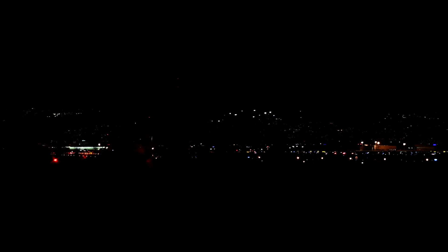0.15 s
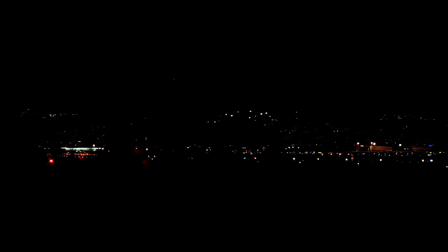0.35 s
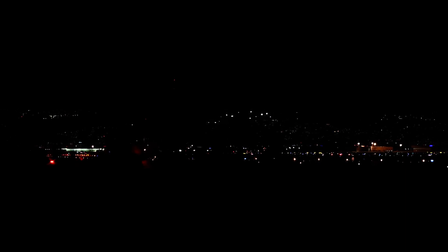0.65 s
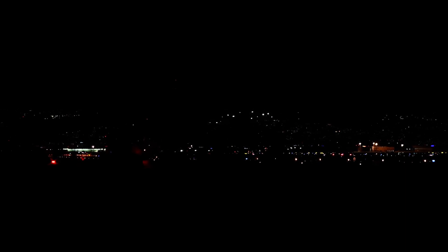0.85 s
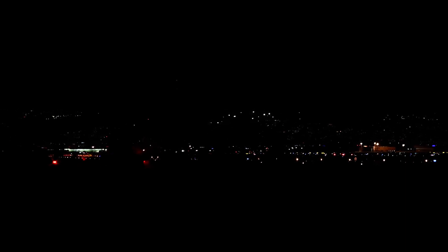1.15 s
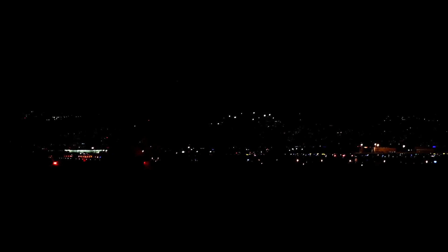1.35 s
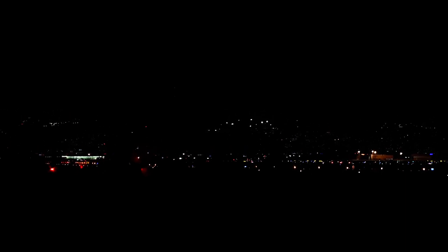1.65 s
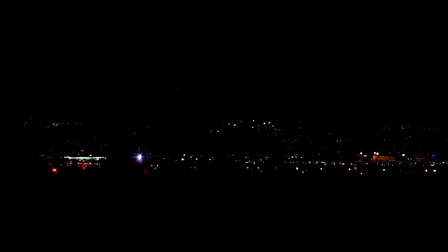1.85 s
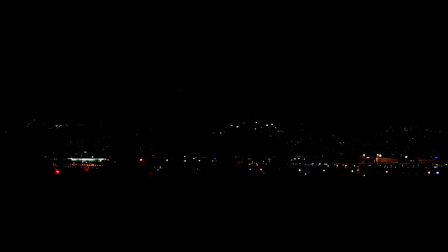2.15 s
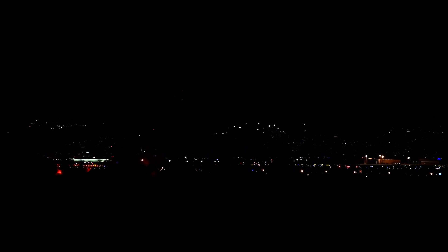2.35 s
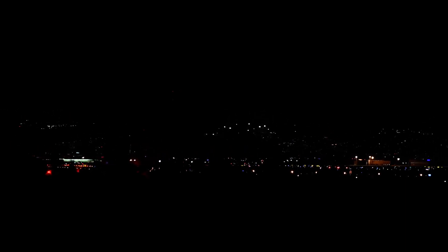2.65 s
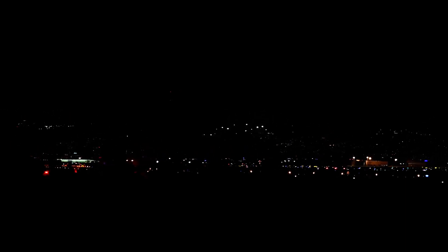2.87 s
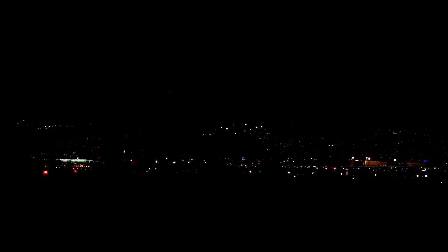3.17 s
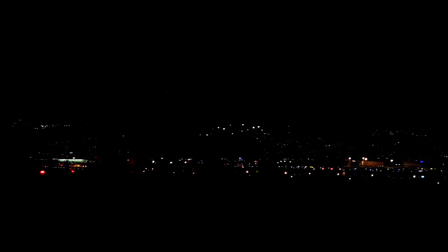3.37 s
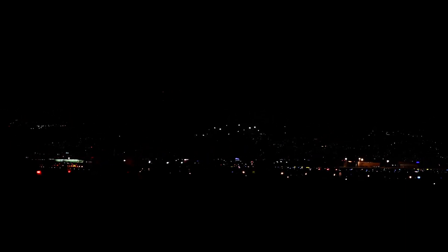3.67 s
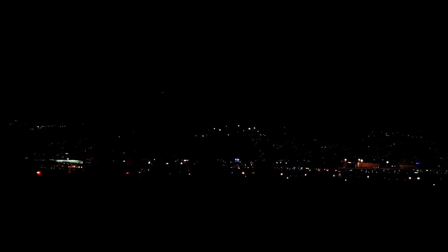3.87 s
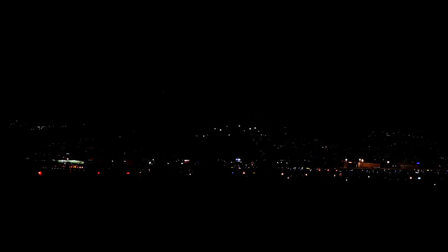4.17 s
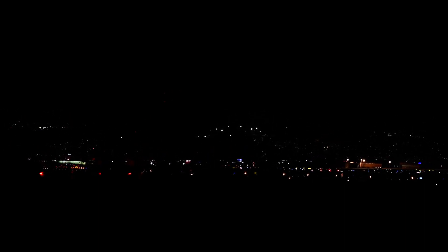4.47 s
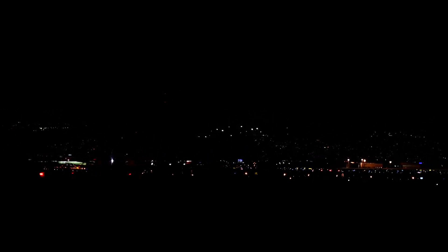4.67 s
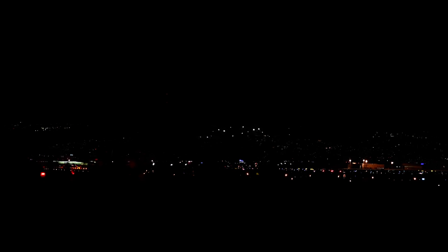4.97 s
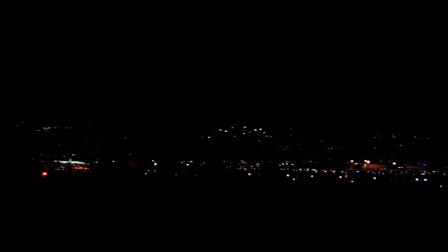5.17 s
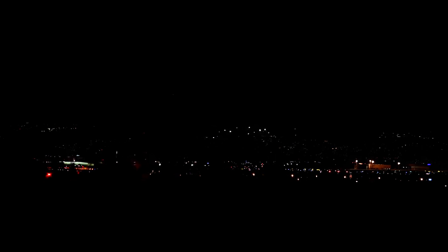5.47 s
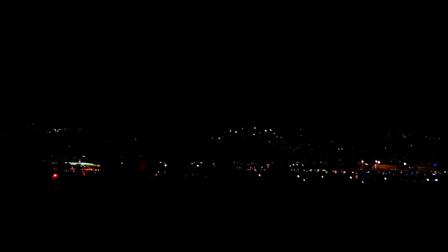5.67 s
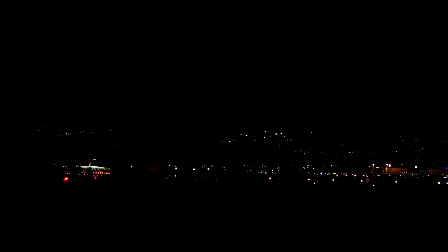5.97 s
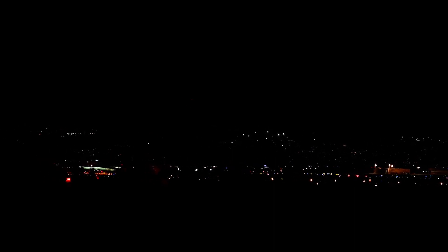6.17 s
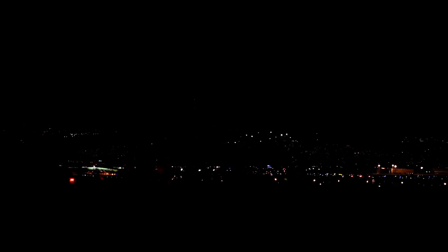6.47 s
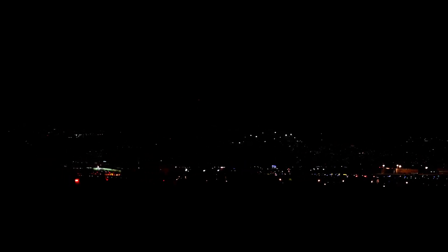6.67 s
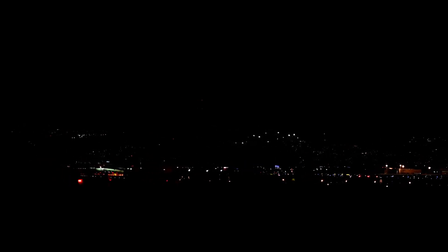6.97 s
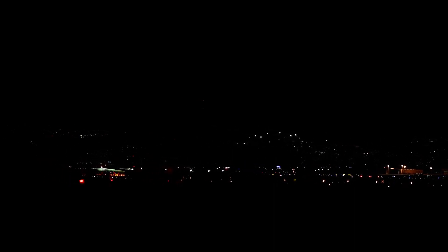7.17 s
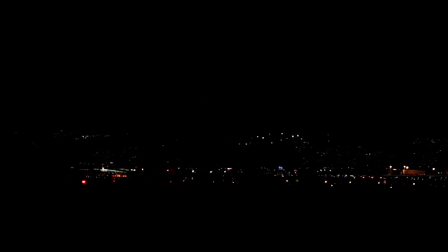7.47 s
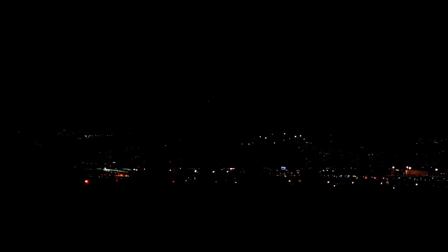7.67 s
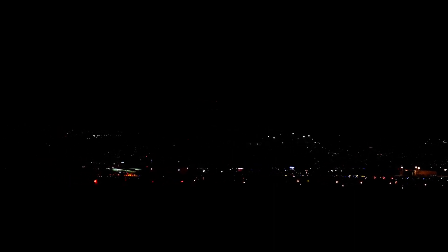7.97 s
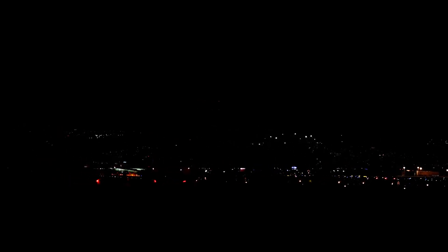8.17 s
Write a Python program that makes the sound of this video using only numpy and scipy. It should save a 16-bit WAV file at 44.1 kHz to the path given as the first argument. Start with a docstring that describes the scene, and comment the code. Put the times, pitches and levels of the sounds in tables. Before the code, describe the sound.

Outdoors on a hill above a night airfield, a far jet's deep rumble slowly swells into a fuller roar with a faint climbing tone. Nearby field crickets chirp in separate songs, a tree cricket trills in short bouts, and tiny insects tick. A hand-held camera adds early finger clicks, two soft bumps, faint whine and hiss; breeze puffs buffet it late.

```python
"""Jet and crickets at night

On a hill above an airfield a distant jet nears: coloured noise bands and a climbing tonal ridge swell.
Field crickets (chirped wing strokes), tree crickets (stroke trains) and smaller insects sing and tick.
A light breeze (low noise puffs) brushes a hand-held camera; fingers touch it (noise bursts, damped
bumps) and its electronics whine faintly twice a second (gated sines). Steady coloured hiss lies below."""
import sys
import numpy as np
from scipy import signal
from scipy.fft import rfft, irfft, next_fast_len
from scipy.io import wavfile
from scipy.ndimage import uniform_filter1d, map_coordinates

SR = 44100
rng = np.random.default_rng(int(sys.argv[2]) if len(sys.argv) > 2 else 0)


def master_out(mix):
    """Clip the mix to full scale and print it as 16-bit PCM to the path in sys.argv[1]."""
    frames = np.transpose(np.atleast_2d(mix))
    ceiling = np.clip(frames, -1, 1)
    pcm = np.round(ceiling * 32767).astype(np.int16)
    wavfile.write(sys.argv[1], SR, pcm)


N = 367132
T = np.arange(N) / SR

# jet approach, before trims: [t/s, roar level/dB, high rush level/dB]
JET_APPROACH = [(0.1, -62.5, -69), (2.15, -61, -72), (2.76, -61, -71.5), (3.23, -58.5, -70),
                (4.09, -58.5, -68), (6.94, -48.5, -59.5), (7.3, -49.5, -59.5), (7.84, -48, -59.5),
                (8.2, -49, -59.5)]
# spectra, relative density: [f/Hz, level/dB]
FAR_RUMBLE_SPECTRUM = [(12, -47), (22, -25), (33, -18), (52, -3.5), (75, 1), (97, 1.5), (125, -4),
                       (150, -5.5), (180, -14), (225, -15.5), (330, -36)]
NEAR_RUMBLE_SPECTRUM = [(12, -40), (22, -15), (33, -15.5), (46, 2), (62, -0.5), (95, -1), (120, -5.5),
                        (148, -11), (175, -24), (260, -40)]
# roar spectrum as for a ridge at ROAR_REF_HZ, relative density: [f/Hz, level/dB]
ROAR_SPECTRUM = [(130, -24), (180, -2), (215, -2.5), (250, -3.5), (300, -1.5), (400, -1.5), (520, -2),
                 (610, -1), (685, -4.5), (730, -6.5), (800, -12), (1100, -47.5)]
# spectra, relative density: [f/Hz, level/dB]
RUSH_SPECTRUM = [(550, -9.5), (700, -0.5), (800, -4.5), (970, -1), (1100, -6), (1210, -9), (1450, -7.5),
                 (1640, -11.5), (1830, -17), (2050, -15.5), (2640, -22.5), (3900, -37.5)]
HISS_SPECTRUM = [(1100, -6.5), (1750, 9), (2200, 2), (2800, -3.5), (4400, -3.5), (6100, -4), (7800, -5.5),
                 (9600, -0.5), (10800, -8.5), (12500, -14.5), (15500, -24)]
BUFFET_SPECTRUM = [(12, -28), (20, -8), (80, 8), (125, 1.5), (250, -6), (450, -25), (800, -50)]
# rumble surges on the way through the air: [peak t/s, length/s, extra level/dB]
RUMBLE_SURGES = [(3.9, 1, 3), (6.423, 0.51, 3.5), (7.5, 0.56, 3.5)]
# nearest tree cricket's bouts, nominal level: [start t/s, length/s, level/dB]
TREE_CRICKET_BOUTS = [(0, 0.34, -69.5), (.49, .28, -68.5), (1.0, 0.21, -66), (1.44, 0.26, -67.5),
                      (1.99, 0.24, -67), (2.485, .35, -64), (3.0, 0.37, -66), (3.426, 0.25, -67.5),
                      (3.93, 0.16, -65), (5.544, 0.12, -69.5), (5.992, 0.15, -68.5), (6.664, .18, -70),
                      (8.05, 0.15, -71)]
# breeze puffs at the microphone ports, nominal level: [peak t/s, length/s, level/dB]
BREEZE_PUFFS = [(.15, 0.66, -69), (1.44, 0.21, -71), (2.855, 0.28, -64.5), (5.622, 0.086, -69),
                (6.032, 0.17, -74), (6.888, 0.24, -50), (7.55, .2, -62), (8.05, 0.76, -59)]
# bush cricket rasps, level before pan and tail: [first t/s, rasps, spacing/s, level/dB]
BUSH_CRICKET_RASPS = [(0.11, 4, .14, -74), (2.18, 5, .135, -76), (4.40, 5, .135, -76), (6.43, 6, 0.14, -78)]
# triple ticks of a small insect, level before pan and tail: [t/s, level/dB]
TRIPLE_TICKS = [(0.645, -74), (1.80, -74), (2.93, -74), (4.14, -74), (5.29, -73), (6.27, -75), (7.575, -72)]
# thin high calls, level before pan and tail: [first t/s, strokes, spacing/s, level/dB]
THIN_CALLS = [(2.81, 5, .073, -86), (6.39, 4, .073, -83.5)]
# finger clicks, noise level before band-pass: [t/s, level/dB]
FINGER_CLICKS = [(0.2942, -71), (0.3074, -61.5), (0.316, -66), (0.3556, -64), (0.398, -69)]
# camera body bumps, nominal level before left/right offset: [t/s, level/dB, f/Hz]
BODY_BUMPS = [(0.395, -45, 120), (0.828, -50, 102)]
# field cricket songs, counts get rounded, f and level nominal: [start t/s, slow strokes, slow spacing/s,
# trill strokes, pairs, f/Hz, level/dB, trill re slow strokes/dB, left re right/dB, left lead/rad]
FIELD_CRICKET_SONGS = [ (0.452, 6, .068, 4, 2.5, 3886, -66.5, -5, 4, 0.2),
                       (1.399, 6, .067, -0.5, 0.5, 4120, -74, -6, 1, -2.5),
                       (2.048, 6, .0712, 3, 2.5, 3830, -70.5, -4, -9.5, 4.5),
                       (2.742, 6, .071, 6.5, 1, 3920, -67.5, -7.5, 4.5, -2.5),
                       (4.283, 7, .069, 5, 4, 3870, -64.5, -6, 6, .7),
                       (6.241, 6, .072, 7.5, 3, 3920, -68, -5, 5.5, -2.5),
                       (7.126, 6, 0.076, 3, 0, 4050, -81, -6, -2, -2)]

ROAR_TRIM_DB, RUSH_TRIM_DB = .5, 2
# rumble follows roar: level at the reference roar, gain in dB per dB of roar
ROAR_AT_REF_DB, RUMBLE_AT_REF_DB, RUMBLE_DB_PER_DB = -55, -48.5, 1.09
# tonal ridge at the top of the roar: steady pitch, then a climb
ROAR_REF_HZ, RIDGE_HZ, CLIMB_FROM_S, CLIMB_HZ_PER_S = 680, 581.6, 5.7, 50
# ridge level re roar, plus one swell
RIDGE_DB, RIDGE_PEAK_S, RIDGE_SWELL_S, RIDGE_EXTRA_DB = -15, 6.5, 1.0, 8.1
CHORUS_DB, CHORUS_RISE_DB_PER_S, CHORUS_WAVER_DB = -84.5, 0.45, 0.8
CALM_DB = -92.5  # air stirring between puffs
# first strokes of a song: this much weaker and lower, easing off over a few strokes
WARM_UP_DB, WARM_UP_HZ, WARM_UP_STROKES = 12, 80, 1.33
# quick strokes: spacing, drop in pitch, weakening of the first in each group
QUICK_S, QUICK_DROP_HZ, LEAD_IN_DB = .0445, 60, 5
# step to each quick group, its growth per further pair, level lost per group
PAUSE_S, PAUSE_GROWS_S, PAIR_FADE_DB = .1, .026, .6
CUTOFF_HZ = 15650


def from_db(db):
    """Decibels to gain."""
    return 10 ** (np.asarray(db) / 20)


def rms_one(x):
    """Scale to unit rms."""
    return x / np.sqrt(np.mean(np.abs(x) ** 2) + 1e-20)


def in_time(rows):
    """Each column of a curve, interpolated at every sample."""
    s, *columns = np.transpose(rows)
    return [np.interp(T, s, column) for column in columns]


def swell(peak_s, length_s):
    """Smooth rise and fall of height 1, length_s wide at half height."""
    return .5 ** np.minimum((2 * (T - peak_s) / length_s) ** 2, 60)


def drift(rate_hz):
    """Smooth random curve of rms 1, about rate_hz changes a second."""
    knots = rng.standard_normal(4096)
    return rms_one(map_coordinates(knots, [T * rate_hz + 2], order=2, mode="wrap"))


def noise(spectrum, side_db):
    """Stereo noise shaped in frequency: mid of about rms 1, side at side_db re mid."""
    hz, db = np.transpose(spectrum)
    size = next_fast_len(N)
    bins_hz = np.maximum(np.fft.rfftfreq(size, 1 / SR), 1)
    gain = from_db(np.interp(np.log(bins_hz), np.log(hz), db, left=-200, right=-200))
    white = rng.standard_normal((2, size))
    mid, side = rms_one(irfft(rfft(white) * gain, size)[:, :N])
    return mid + from_db(side_db) * side * [[1], [-1]]


def noise_band(hz, width_hz):
    """Independent stereo noise in one band with steep skirts, rms 1."""
    edges_hz = [hz - width_hz / 2, hz + width_hz / 2]
    sos = signal.butter(2, edges_hz, "band", fs=SR, output="sos")
    return rms_one(signal.sosfilt(sos, rng.standard_normal((2, N)) + 1e-18))


def place(tone, pan_db, lead_rad):
    """Complex tone at two microphone ports: left louder by pan_db, ahead by lead_rad."""
    left = from_db(pan_db / 2) * np.exp(.5j * lead_rad)
    right = from_db(-pan_db / 2) * np.exp(-.5j * lead_rad)
    return np.real(tone * np.array([[left], [right]]))


def add(out, sound, s):
    """Mix a short stereo sound in, centred on time s."""
    start = round(s * SR) - sound.shape[1] // 2
    low, high = max(start, 0), min(start + sound.shape[1], N)
    if high > low:
        out[:, low:high] += sound[:, low - start:high - start]


def stroke(hz, length_s, fall, bend=0):
    """One closing of the wings: the file slows, so the tone swells, sags in pitch and fades."""
    u = np.linspace(-1, 1, max(int(length_s * SR), 8))
    pitch_hz = hz * (1 - fall * u - bend * u * u)
    cycles = np.cumsum(pitch_hz) / SR + rng.random()
    return np.cos(np.pi * u / 2) ** 2 * np.exp(2j * np.pi * cycles)


def trill(hz, per_s, duty, fall, jitter):
    """Unbroken train of slightly uneven wing strokes; complex, rms 1."""
    cycle = np.cumsum(per_s * (1 + jitter * drift(20))) / SR % 1
    u = np.clip(cycle / duty, 0, 1)
    pitch_hz = hz * (1 + fall * (1 - 2 * u) + .006 * drift(40))
    envelope = np.sin(np.pi * u) * from_db(2 * drift(50))
    return rms_one(envelope * np.exp(2j * np.pi * np.cumsum(pitch_hz) / SR))


def hillside(x, wet_db, t60_s):
    """Grass and bushes scatter a short diffuse stereo tail, fed from the left channel."""
    t = T[:SR // 3]
    tail = rng.standard_normal((2, len(t))) * from_db(-60 * t / t60_s) * (t > .006)
    tail /= np.sqrt(np.sum(tail ** 2, axis=1, keepdims=True))
    return x + from_db(wet_db) * signal.fftconvolve(x[:1], tail, axes=1)[:, :N]


def jet_rumble(roar_db):
    """Exhaust rumble: far colour fades into near colour, level follows the roar and surges."""
    nearness = np.clip((T - 1.5) / 2.47, 0, 1)
    far = np.sqrt(1 - nearness) * noise(FAR_RUMBLE_SPECTRUM, side_db=-26.0)
    near = np.sqrt(nearness) * noise(NEAR_RUMBLE_SPECTRUM, side_db=-52.0)
    rumble = far + near
    # large eddies keep a fairly even strength
    rumble /= np.sqrt(uniform_filter1d(np.mean(rumble ** 2, axis=0), size=SR // 5))
    surge_db = sum(db * swell(s, length_s) for s, length_s, db in RUMBLE_SURGES)
    level_db = RUMBLE_AT_REF_DB + RUMBLE_DB_PER_DB * (roar_db - ROAR_AT_REF_DB) + surge_db
    return from_db(level_db) * rumble


def jet_roar(roar_db):
    """Exhaust roar: noise resampled to slide up with a narrow ridge, which is added on top."""
    ridge_hz = RIDGE_HZ + CLIMB_HZ_PER_S * np.maximum(T - CLIMB_FROM_S, 0)
    travel = np.cumsum(ridge_hz / ROAR_REF_HZ)
    source = noise(ROAR_SPECTRUM, side_db=-21.5)
    roar = np.array([map_coordinates(c, [travel], order=1, mode="wrap") for c in source])
    carrier = np.exp(2j * np.pi * np.cumsum(ridge_hz) / SR)
    ridge = rms_one(np.real((drift(60) + 1j * drift(60)) * carrier))
    ridge_db = RIDGE_DB + RIDGE_EXTRA_DB * swell(RIDGE_PEAK_S, RIDGE_SWELL_S)
    return from_db(roar_db + ROAR_TRIM_DB) * rms_one(roar + from_db(ridge_db) * ridge)


def jet():
    """Turbulent exhaust through much air: it deepens, swells and shifts up in colour as it nears."""
    roar_db, rush_db = in_time(JET_APPROACH)
    rush = noise(RUSH_SPECTRUM, side_db=-10.0) * from_db([[-.5], [.5]])
    return jet_rumble(roar_db) + jet_roar(roar_db) + from_db(rush_db + RUSH_TRIM_DB) * rush


def tree_crickets():
    """One trills in bouts on the left, over a noise-band blur of distant ones."""
    gates = [from_db(db) * ((T > s) & (T < s + length_s)) for s, length_s, db in TREE_CRICKET_BOUTS]
    bouts = uniform_filter1d(sum(gates), size=SR // 20)
    voice = trill(3200, 62, duty=.8, fall=.03, jitter=0.1)
    singer = place(bouts * voice, pan_db=6.5, lead_rad=-2.12)
    far = noise_band(3136, 290) * from_db([[1.2], [-1.2]])
    far_db = -77.0 + 0.39 * T + 1.15 * drift(25)
    return hillside(singer, wet_db=-24, t60_s=0.22) + from_db(far_db) * far


def chorus():
    """Far crickets near one pitch: two trills, stronger on the left, over a noise-band blur."""
    low = trill(5470, 55, duty=0.94, fall=.012, jitter=0.075)
    high = trill(5550, 73, duty=.9, fall=0.013, jitter=0.17)
    voices = place(low + high, pan_db=3, lead_rad=-2.67)
    blur = noise_band(5495, 290)
    level_db = CHORUS_DB + CHORUS_RISE_DB_PER_S * T + CHORUS_WAVER_DB * drift(5.5)
    return from_db(level_db) * (from_db(1.5) * voices + from_db(3.5) * blur)


def night_hiss():
    """Steady wide noise of the night."""
    return from_db(-75.5) * noise(HISS_SPECTRUM, side_db=0.5)


def breeze():
    """Small puffs of air buffet each microphone port almost on its own: low noise, wide stereo."""
    puffs = sum(from_db(db) * swell(s, length_s) for s, length_s, db in BREEZE_PUFFS)
    flow = from_db(CALM_DB) + puffs
    return flow * from_db(2.0 * drift(15)) * noise(BUFFET_SPECTRUM, side_db=-0.5)


def small_insects():
    """Short wing strokes: rasps, triple ticks, thin high calls and a soft twitter of pips."""
    out = np.zeros((2, N))
    for s, rasps, spacing_s, db in BUSH_CRICKET_RASPS:
        for k in range(round(rasps)):
            for offset_s in np.linspace(-.024, .024, num=5):
                rasp = stroke(4820 + 60 * rng.normal(), 0.015, fall=0.06)
                add(out, place(from_db(db) * rasp, -2, 1.0), s + k * spacing_s + offset_s)
    for s, db in TRIPLE_TICKS:
        for k in range(3):
            tick = stroke(7820, .016, fall=.06)
            add(out, place(from_db(db) * tick, 1, 0.56), s + k * .025)
    for s, strokes, spacing_s, db in THIN_CALLS:
        for k in range(round(strokes)):
            call = stroke(11850, .03, fall=.06)
            add(out, place(from_db(db) * call, 2, 1), s + k * spacing_s)
    # twitter: random throughout, slowly fainter
    for when, size, pitch, side in rng.random((420, 4)):
        s = when * T[-1]
        pip_db = -85 + 6 * size - .6 * s
        pip = from_db(pip_db) * stroke(6480 + 620 * pitch, .03, fall=.025)
        add(out, place(pip, 6 * (side - .5), 2 * np.pi * side), s)
    return hillside(out, wet_db=-5.5, t60_s=0.046)


def electronic_whine():
    """Two steady sines, gated on briefly every half second."""
    busy = uniform_filter1d(1. * ((T - .185) % .5 < .09), size=500)
    low = from_db(-88.5) * np.sin(2 * np.pi * 11712 * T)
    high = from_db(-96) * np.sin(2 * np.pi * 12079 * T)
    return busy * (low + high) * from_db(1.5 * drift(2.9))


def camera_handling():
    """Fingers: decaying noise clicks and light rubbing, band-passed; damped low bumps, right louder."""
    out = np.zeros((2, N))
    for s, db in FINGER_CLICKS:
        age_s = np.maximum(T - s, 0)
        out += from_db(db) * (T > s) * np.exp(-age_s / 0.013) * rng.standard_normal((2, N))
    # rubbing while the grip settles
    rub = np.interp(T, [.25, .35, .75, 1.0], [0.24, 1, .7, 0.049])
    out += from_db(-77.5 + 3 * drift(40)) * rub * rng.standard_normal((2, N))
    sos = signal.butter(2, [3500, 12500], "band", fs=SR, output="sos")
    out = signal.sosfilt(sos, out + 1e-18)
    for s, db, hz in BODY_BUMPS:
        age_s = np.maximum(T - s, 0)
        rise = age_s / 0.0071
        envelope = rise * np.exp(1 - np.minimum(rise, 50))
        out += from_db(db + np.array([[-4], [4]])) * envelope * np.sin(2 * np.pi * hz * age_s)
    return out


def song(slow, spacing_s, quick, pairs, trill_db):
    """Swelling slow strokes, a quick trill, then ever later, fainter pairs.

    Rows: (t/s after start, stroke period/s, pitch offset/Hz, level offset/dB)."""
    cold = np.exp(-(np.arange(round(slow)) / WARM_UP_STROKES) ** 2)
    strokes = [(k * spacing_s, spacing_s, -WARM_UP_HZ * c, -WARM_UP_DB * c) for k, c in enumerate(cold)]
    for group, count in enumerate([round(quick)] + [2] * round(pairs)):
        start_s = strokes[-1][0] + PAUSE_S + PAUSE_GROWS_S * max(group - 1, 0)
        group_db = trill_db - PAIR_FADE_DB * group
        for k in range(count):
            level_db = group_db - LEAD_IN_DB * (k == 0)
            strokes.append((start_s + k * QUICK_S, QUICK_S, -QUICK_DROP_HZ, level_db))
    return strokes


def field_crickets():
    """Songs of wing strokes that start level, then fall in pitch, over a noise-band blur of far singers."""
    out = np.zeros((2, N))
    for s, slow, spacing_s, quick, pairs, hz, db, trill_db, pan_db, lead_rad in FIELD_CRICKET_SONGS:
        for after_s, period_s, offset_hz, offset_db in song(slow, spacing_s, quick, pairs, trill_db):
            stroke_hz = (hz + offset_hz) * (1 + 0.0066 * rng.normal())
            tone = stroke(stroke_hz, 0.63 * period_s, fall=0.039 + 0.98 * period_s, bend=0.073)
            effort = from_db(db + offset_db + rng.normal(0, 1))
            add(out, place(np.sqrt(2) * effort * tone, pan_db, lead_rad), s + after_s)
    far = noise_band(3910, 460) * from_db(-87.5 + 2.5 * drift(25))
    return hillside(out, wet_db=-10, t60_s=.19) + far


def scene():
    """Sum of jet, insects, hiss, breeze and camera sounds."""
    far_sounds = jet() + tree_crickets() + chorus() + night_hiss()
    camera = electronic_whine() + camera_handling()
    return far_sounds + breeze() + small_insects() + camera + field_crickets()


def record(dry):
    """The recorder low-passes steeply at CUTOFF_HZ."""
    return signal.sosfilt(signal.ellip(10, .1, 70, CUTOFF_HZ, fs=SR, output="sos"), dry)


dry = scene()
out = record(dry)
master_out(out)
```